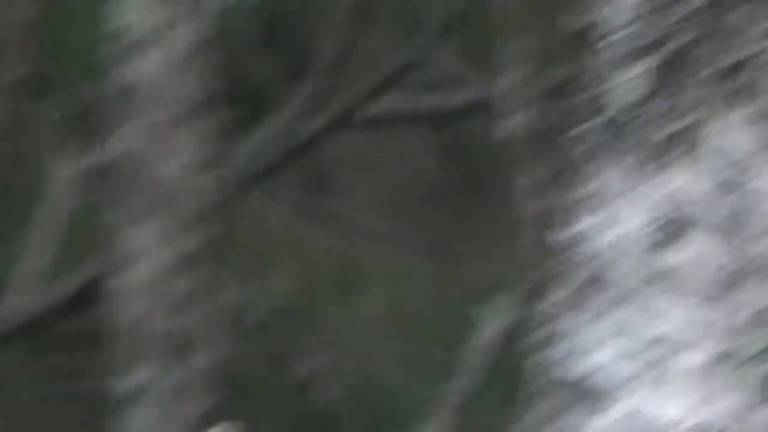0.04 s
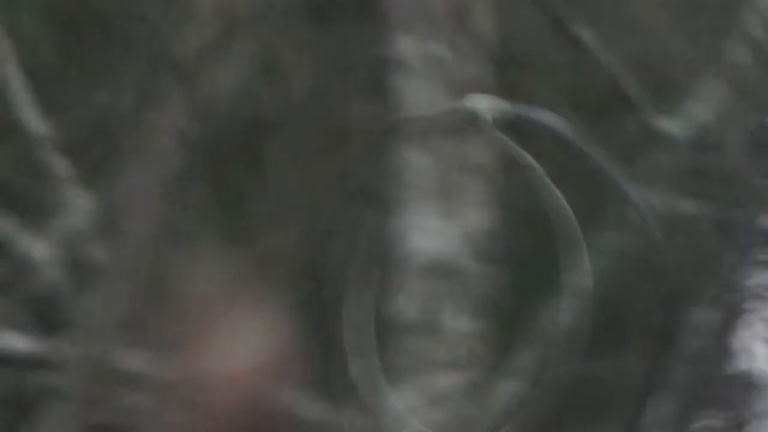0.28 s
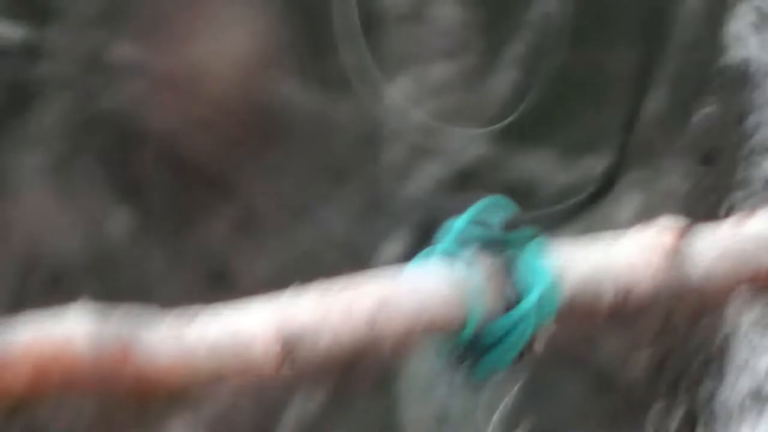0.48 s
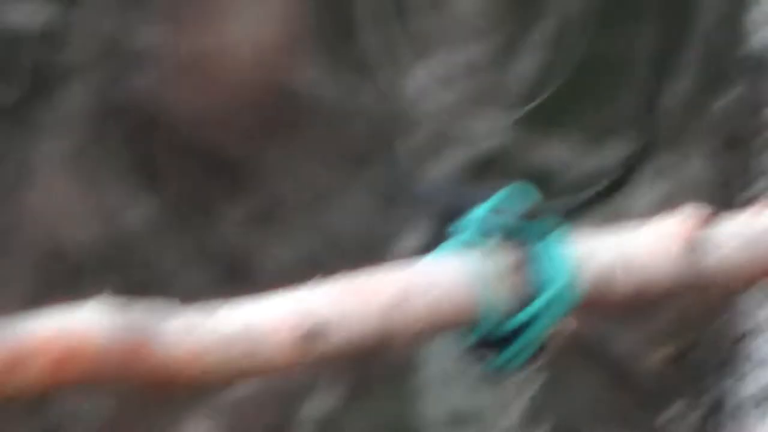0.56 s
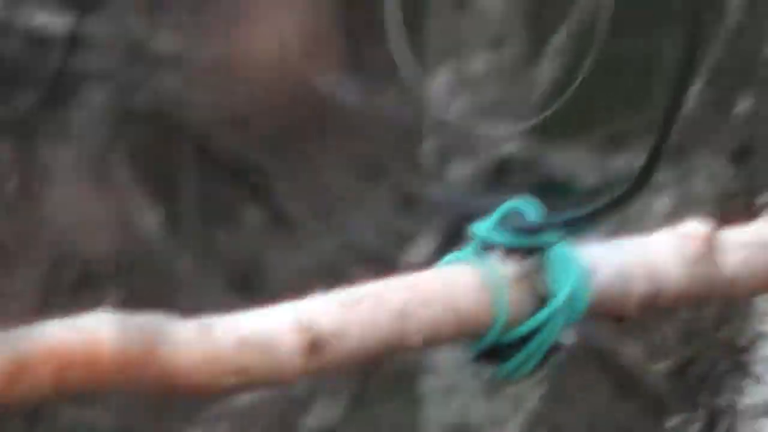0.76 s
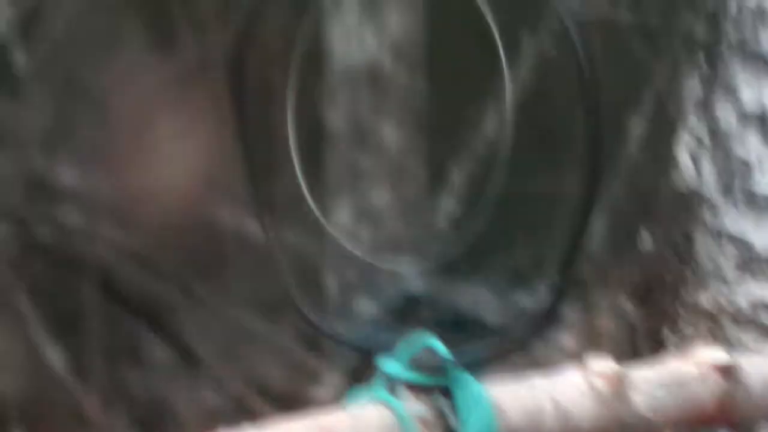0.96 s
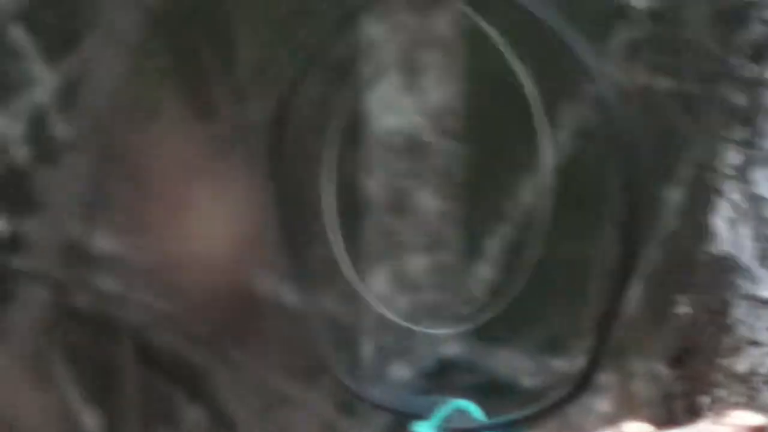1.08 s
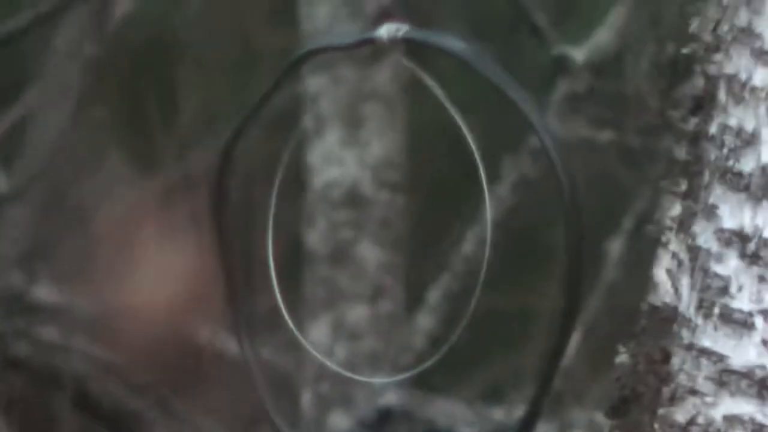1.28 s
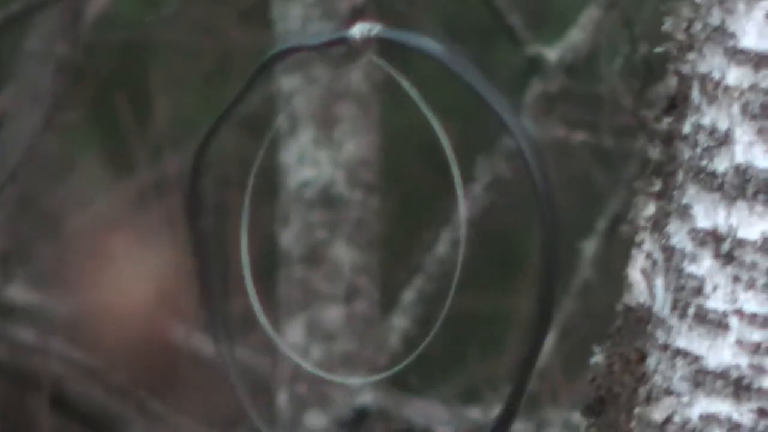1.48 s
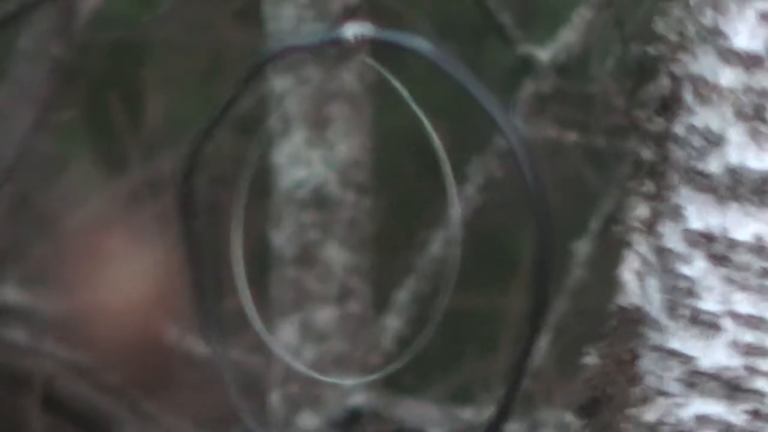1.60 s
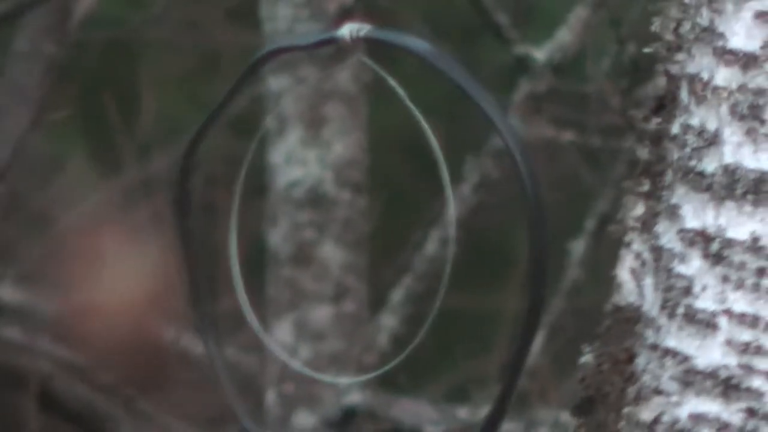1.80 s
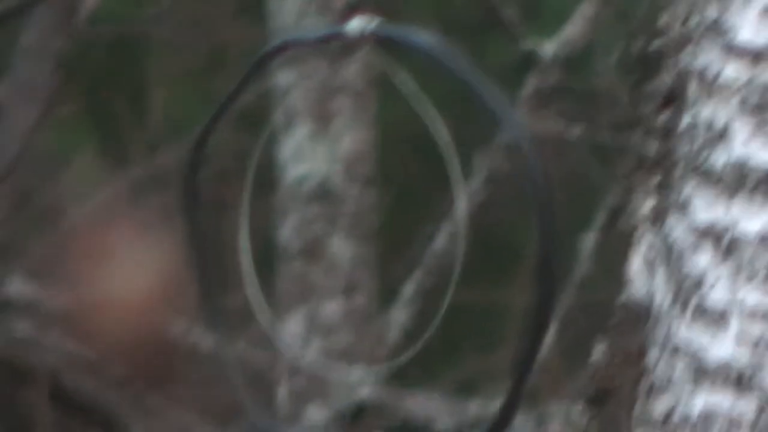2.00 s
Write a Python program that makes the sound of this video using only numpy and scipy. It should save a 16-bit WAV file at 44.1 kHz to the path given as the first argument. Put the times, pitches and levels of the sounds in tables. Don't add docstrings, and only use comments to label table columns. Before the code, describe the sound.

Handling thumps on a camera shell, very close and dry. Light bumps and lid taps begin at once, growing to strong low thuds around 0.2 and 0.3 seconds with brief rattles and creaks. After a lull, a finger rubs from 0.65 to 0.94, with a creaking push at 0.81. A hard double knock lands at 1.03, a thin twig tick at 1.29, faint touches near 1.4, then soft hiss and low tremor.

```python
import sys
import numpy as np
from scipy import signal
from scipy.fft import rfft, irfft
from scipy.io import wavfile
from scipy.ndimage import uniform_filter1d

SR = 44100
rng = np.random.default_rng(int(sys.argv[2]) if len(sys.argv) > 2 else 0)


def file_out(sig):
    cols = np.atleast_2d(sig).T
    lim = np.clip(cols, -1, 1)
    pcm = np.round(lim * 32767).astype(np.int16)
    wavfile.write(sys.argv[1], SR, pcm)


def linear_from_db(decibels):
    return 10 ** (np.asarray(decibels, float) / 20)


N = 90404

# (frequency [Hz], level per Hz [dB])
HISS = [(120, -9.5), (260, -0.5), (450, -1), (1200, -5), (2760, -9.5), (7000, -14.5), (12000, -18.5),
        (15600, -23.5)]
# (frequency [Hz], likeness [-1 to 1])
HISS_ALIKE = [(60, 1), (130, -0.96), (290, -0.6), (640, -0.51), (1410, -0.38), (3100, -0.32), (6800, 0.045),
              (15000, -0.0037)]
# (time [s], level [dB])
TREMOR_LEVEL = [
    (0.0, -49.5),
    (0.22, -50.5),
    (0.47, -60),
    (0.75, -61.5),
    (0.99, -49),
    (1.18, -61),
    (1.57, -63),
    (2.05, -64.5),
]
# (frequency [Hz], level [dB])
TREMOR_COLOUR = [(15, -2.5), (30, 0.5), (50, 3.5), (90, 1.5), (130, -7.5), (250, -10), (500, -43.5)]
# (frequency [Hz], level [dB])
WHINE = [(7800, -85), (7825, -85)]

# (time [s], strength [dB], contact [ms], twist [dB], grip stiffness [ratio])
PULLS = [(.008, -42.5, 2.3, 7, 1.21), (0.096, -34.5, 1.78, -2, 1.69), (0.106, -29.5, 3.1, -3, 0.97),
         (0.2046, -15, 3.55, -7, 1.036), (0.2134, -15.5, 5.3, -4, 0.85), (.3095, -11, 4.37, -26, 1.24),
         (0.3174, -17.5, 3.55, 2.5, 0.96), (0.3225, -12, 3.14, -11, 0.9), (0.973, -35.5, 2.1, -3, 1.18),
         (1.132, -32.5, 8, -2, 0.85), (1.378, -50.5, 3.7, -16, 0.68), (0.378, -43, 2.7, -14, 0.8),
         (0.123, -44, 4.1, -8, 1.1), (.168, -43, 4, -12, 0.99), (1.398, -52.5, 4.1, -14, 0.8)]
PUSHES = [
    (0.8105, -21.5, 2.6, -5, 1.02),
    (0.837, -33, 8.3, -13, 0.85),
    (1.075, -49, 1.9, -15, 1.5),
    (1.215, -57, 1.3, -10, 1.7),
    (1.235, -62, 6.3, -3, 1.4),
]
LID_TAPS = [
    (0.0898, -27.5, 0.66, 0.1, 0.98),
    (0.192, -34, 1, 3, 1.13),
    (0.6559, -41, 0.78, 0.2, 1.27),
]
FLANK_PRESS = [
    (1.0265, -13, 1.36, -2, 1.24),
]
FLANK_REBOUND = [
    (1.0288, -13, 1.95, -12, 1.04),
]
# (frequency [Hz], level [dB], time to fall 60 dB [s])
BODY = [(97.2, 4, 0.072), (169.7, 6.2, 0.031), (236, -3.5, 0.07), (486, -8.5, 0.027), (640, -6.5, 0.022),
        (774, -10, 0.023), (985, -0.5, 0.039), (1400, -6, 0.021)]
BODY_TWIST = [(172, -8, 0.093), (286, -2.5, 0.075), (450, -8, .03), (570, -4, 0.09), (777, 3, 0.075),
              (980, 6, 0.054), (1290, -36, 0.043)]
LID = [(249.7, -1, 0.061), (787, 0.1, 0.017), (983, -7, 0.024), (1490, 3, 0.014), (1940, -10, 0.017)]
LID_TWIST = [(280, -8.5, 0.065), (693, -2, 0.027), (1010, -3.5, .03), (1310, -2, 0.037)]
FLANK = [(89, -22, 0.13), (110, 0, 0.063), (167, -2.5, 0.033), (294, -8, 0.059), (444, 0.5, 0.035),
         (576, -11, 0.039), (795, -16, 0.029), (1010, -12.5, 0.054)]
FLANK_TWIST = [(200, -27, 0.036), (302, -4, 0.082), (450, 3, 0.043), (570, -8, 0.053), (735, -5, .04),
               (1047, -3, .04), (1390, -8, .03)]

# (time [s], length [s], level [dB])
RATTLES = [
    (.066, 0.029, -56.5),
    (.112, 0.014, -61),
    (.175, 0.037, -64),
    (.217, 0.014, -54),
    (.323, 0.015, -51),
    (0.333, 0.0084, -54),
    (.81, .016, -51.5),
    (1.381, 0.009, -61),
    (1.386, 0.013, -62),
]
# (time [s], length [s], level [dB], upper note [dB])
CREAKS = [
    (0.198, 0.023, -55, -4),
    (0.212, 0.021, -54.5, -2.5),
    (0.313, 0.016, -59, 4.5),
    (.322, 0.023, -45, -4.5),
    (0.81, 0.02, -43.5, -11),
]
# (time [s], level [dB])
RUB_PRESSURE = [
    (.65, -58),
    (.66, -48.5),
    (.7, -60.5),
    (.728, -68),
    (.77, -58),
    (.82, -53.5),
    (.866, -53),
    (.91, -63),
    (.94, -77.5),
]
# (frequency [Hz], width [Hz], level [dB])
RUB_NOTES = [(307, 190, 1), (976, 350, -1.5), (1280, 320, 2.1), (1830, 400, -9), (2700, 470, -6),
             (3400, 520, -3.5), (3990, 220, -3), (5300, 1500, -6)]
# (frequency [Hz], width [Hz], level [dB])
TICK_NOTES = [(7620, 1200, 6), (9600, 2500, -12), (13700, 3500, -10)]


def evened(x):
    return x / np.sqrt(np.mean(x ** 2) + 1e-20)


def read(points, hz):
    f, value = np.transpose(points)
    return np.interp(np.log(hz + 1), np.log(f + 1), value)


def level(curve):
    s, db = np.transpose(curve)
    return linear_from_db(np.interp(np.arange(N) / SR, s, db))


def add(mix, s, sound):
    part = mix[:, round(s * SR):][:, :sound.shape[1]]
    part += sound[:, :part.shape[1]]


def resonate(x, hz, width):
    return signal.lfilter(*signal.iirpeak(hz, hz / width, SR), x)


def resonate_twice(x, hz, width):
    return resonate(resonate(x, hz, width), hz, 2 * width)


def coloured(shape, alike):
    hz = np.fft.rfftfreq(N, 1 / SR)
    left, other = rfft(rng.standard_normal((2, N)))
    likeness = np.clip(read(alike, hz), -1, 1)
    right = likeness * left + np.sqrt(1 - likeness ** 2) * other
    gain = linear_from_db(read(shape, hz)) * (hz < 15700)
    return evened(irfft(np.array([left, right]) * gain, N))


def hiss():
    hiss_db = -55.5
    return linear_from_db(hiss_db) * coloured([(70, -29)] + list(HISS), HISS_ALIKE)


def hand_tremor():
    lump_db = 2.5
    lumps = uniform_filter1d(rng.standard_normal(N), size=1200)
    lumps = evened(uniform_filter1d(lumps, size=1200))
    rumble = coloured(TREMOR_COLOUR, [(50, 1.0), (250, 0.32)])
    return level(TREMOR_LEVEL) * linear_from_db(lump_db * lumps) * rumble


def whine():
    t = np.arange(N) / SR
    return sum(linear_from_db(db) * np.sin(2 * np.pi * hz * t) for hz, db in WHINE)


def ring(modes, stiff, chance, cut_hz):
    detune = 0.015
    t = np.arange(SR // 5) / SR
    move = np.zeros(len(t))
    for (hz, db, t60), luck in zip(modes, chance):
        grip = stiff if 120 < hz < 280 else 1
        pitch = hz * grip * (1 + detune * luck)
        move += linear_from_db(db - 60 * t / t60) * np.sin(2 * np.pi * pitch * t)
    return signal.sosfilt(signal.butter(2, cut_hz, "high", fs=SR, output="sos"), move)


def strikes(way, table, modes, twists):
    body_cut_hz, twist_cut_hz = 105.6, 207
    force_round = 3.55
    out = np.zeros((2, N))
    t = np.arange(1000) / SR
    for s, db, ms, twist_db, stiff in table:
        chance = rng.standard_normal((2, 8))
        u = t * 9000 / ms
        force = u ** force_round * np.exp(-u)
        force = force / force.sum()
        body = ring(modes, stiff, chance[0], body_cut_hz)
        twist = linear_from_db(twist_db) * ring(twists, stiff, chance[1], twist_cut_hz)
        pair = np.array([body + twist, body - twist])
        add(out, s, way * linear_from_db(db) * signal.fftconvolve(pair, force[None]))
    return out


def bumps():
    body = strikes(-0.73, PULLS, BODY, BODY_TWIST) + strikes(0.92, PUSHES, BODY, BODY_TWIST)
    lid = strikes(0.84, LID_TAPS, LID, LID_TWIST)
    press = strikes(0.72, FLANK_PRESS, FLANK, FLANK_TWIST)
    rebound = strikes(-0.76, FLANK_REBOUND, FLANK, FLANK_TWIST)
    return body + lid + press + rebound


def shaken(rows, noise, hz, width):
    shake = np.zeros((1, N))
    for s, length, db in rows:
        u = np.linspace(0, 1, round(length * SR))
        add(shake, s, linear_from_db(db) * np.sin(np.pi * u[None] ** 0.61) ** 2)
    return shake * evened(resonate_twice(noise, hz, width))


def loose_noise():
    return rng.standard_normal(N) + 0.88 * rng.standard_normal((2, N))


def rattle():
    fizz_db = -6.5
    noise = loose_noise()
    buzz = shaken(RATTLES, noise, hz=4040, width=180)
    return buzz + linear_from_db(fizz_db) * shaken(RATTLES, noise, hz=4950, width=2500)


def creaks():
    noise = loose_noise()
    low_rows = [(s, length, db) for s, length, db, up in CREAKS]
    upper_rows = [(s, length, db + up) for s, length, db, up in CREAKS]
    low = shaken(low_rows, noise, hz=718, width=110)
    return low + shaken(upper_rows, noise, hz=1376, width=250)


def rub():
    slips_per_s, slip_spread_db = 1400, 2
    alike, rub_db, mean_db = 0.28, -1, -62
    start_s, treble_follows = 0.649, 0.17
    t = np.arange(N) / SR
    press = level(RUB_PRESSURE) / linear_from_db(mean_db)
    sound = np.zeros((2, N))
    for hz, width, db in RUB_NOTES:
        strength = linear_from_db(slip_spread_db * np.minimum(rng.exponential(1, N), 4))
        slips = strength * (rng.random(N) < slips_per_s / SR)
        left, other = rng.standard_normal((2, N)) * uniform_filter1d(slips, size=40)
        right = alike * left + np.sqrt(1 - alike ** 2) * other
        drive = np.array([left, right]) + 1e-9
        follow = treble_follows if hz > 2300 else 1
        sound += linear_from_db(db) * press ** follow * evened(resonate_twice(drive, hz, width))
    landing = np.clip((t - start_s) / 0.0058, 0, 1)
    lifting = np.clip((RUB_PRESSURE[-1][0] - t) / 0.03, 0, 1)
    return linear_from_db(rub_db + mean_db) * landing * lifting * sound


def twig_tick():
    tick_s, tick_db, rise_ms = 1.2878, -53, 0.44
    side, pan_db = 0.5, -1.5
    out = np.zeros((2, N))
    u = np.arange(400) / SR * 1000 / rise_ms
    noise = rng.standard_normal(400) + side * rng.standard_normal((2, 400))
    snap = noise * u * np.exp(1 - u)
    burst = sum(linear_from_db(db) * resonate(snap, hz, width) for hz, width, db in TICK_NOTES)
    burst = signal.sosfilt(signal.butter(6, (6700, 16100), "band", fs=SR, output="sos"), burst)
    pan = linear_from_db(np.array([[pan_db], [-pan_db]]))
    add(out, tick_s, linear_from_db(tick_db) * evened(burst) * pan)
    return out


def scene():
    background = hiss() + hand_tremor() + whine()
    knocks = bumps()
    dull = signal.butter(4, 9000, fs=SR, output="sos")
    shell = signal.sosfilt(dull, rattle() + creaks() + rub())
    return background + knocks + shell + twig_tick()


def roll_off(x):
    return signal.sosfilt(signal.butter(12, 16760, fs=SR, output="sos"), x)


def record(dry):
    return roll_off(dry)


dry = scene()
out = record(dry)
file_out(out)
```